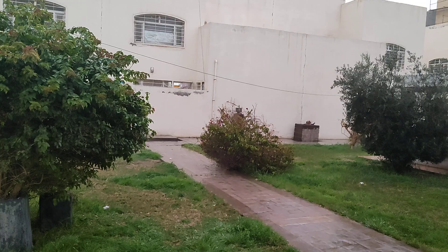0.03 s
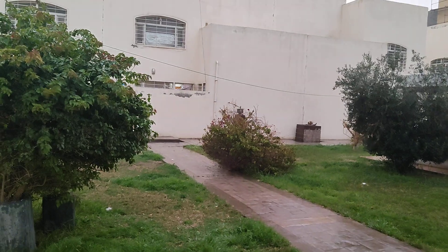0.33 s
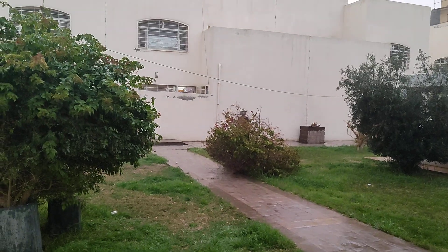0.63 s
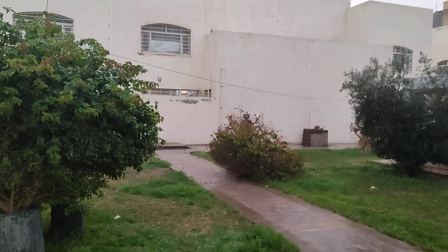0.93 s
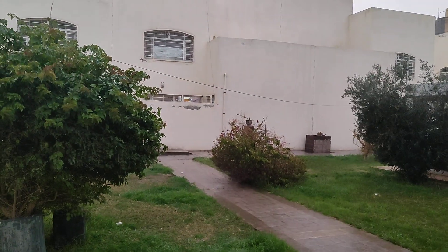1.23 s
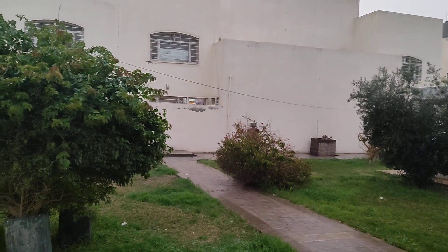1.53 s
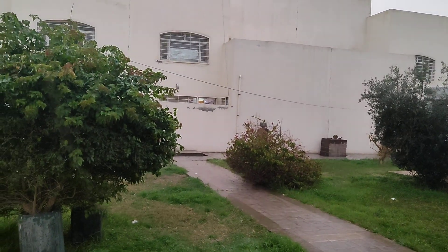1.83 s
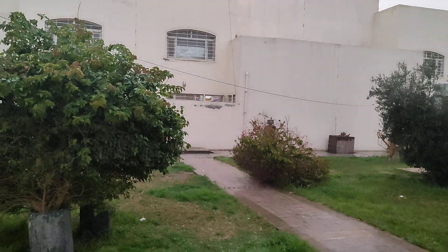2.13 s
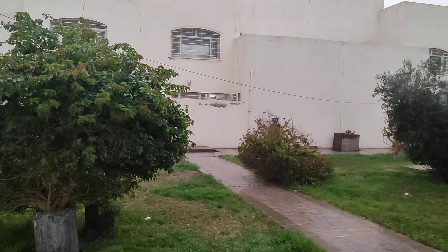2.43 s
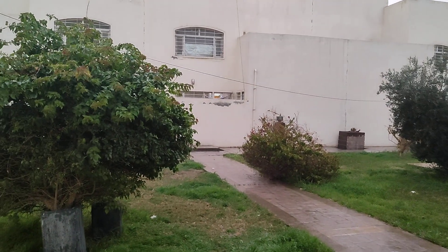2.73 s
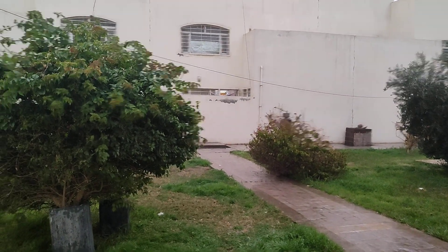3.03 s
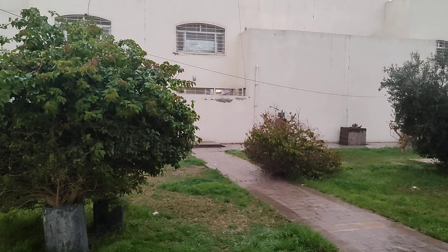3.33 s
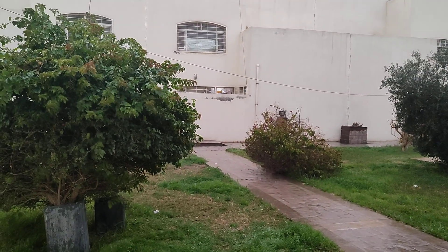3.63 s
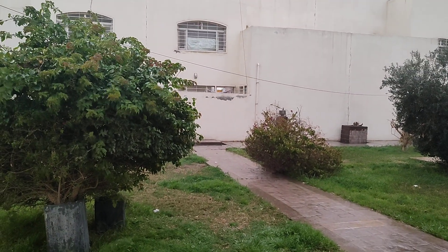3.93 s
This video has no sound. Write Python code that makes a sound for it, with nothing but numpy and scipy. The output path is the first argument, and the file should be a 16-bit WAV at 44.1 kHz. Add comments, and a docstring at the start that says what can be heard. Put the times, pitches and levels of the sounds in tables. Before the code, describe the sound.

Steady light rain outdoors, with low wind rumble and a few taps on the microphone.

```python
"""Light rain on a garden and a paved path: far drops merge into a hiss, a few tick close by.
Gusts buffet the two ports of the hand-held microphone, mostly the left, in rumbles and low thuds.
Right at the microphone, a finger taps and brushes the case a few times.
Far off, a small bird chirps and two thin tones sound."""
import sys
import numpy as np
from scipy import signal
from scipy.fft import rfft, irfft, next_fast_len
from scipy.io import wavfile
from scipy.ndimage import map_coordinates

SR = 44100
rng = np.random.default_rng(int(sys.argv[2]) if len(sys.argv) > 2 else 0)


def generate_wav(signal):
    """Clip the signal to [-1, 1] and save it as 16-bit WAV at the path in sys.argv[1]."""
    frames = np.transpose(np.atleast_2d(signal))
    scaled = np.clip(frames, -1, 1) * 32767
    pcm = np.round(scaled).astype(np.int16)
    wavfile.write(sys.argv[1], SR, pcm)


N = 176400

# spectrum of big slow eddies, also of the input's noise floor (frequency [Hz], level [dB])
RUMBLE_SPECTRUM = [(8, -27.5), (22, -7), (36, 1.5), (70, -2), (150, -7), (240, -17), (350, -30), (520, -42),
                   (1000, -96.5)]
# spectrum of a knock on the microphone case (frequency [Hz], level [dB])
CASE_SPECTRUM = [(40, -2.5), (200, 16), (450, 6.5), (800, -2.5), (1500, -2.5), (3200, 0.5), (5000, -11.5),
                 (8000, -44), (11000, -22.5), (13000, -37.5), (16000, -32)]


def amp(db):
    """Decibels to gain."""
    return 10 ** (np.asarray(db) / 20)


def unit(x):
    """Scale to rms 1."""
    return x / np.sqrt(np.mean(x ** 2) + 1e-20)


def clock():
    """Time of each sample in seconds."""
    return np.arange(N) / SR


def curve(rows):
    """(time [s], value) points joined by lines."""
    return np.interp(clock(), *np.transpose(rows))


def wobble(rate):
    """A smooth random curve, rate knots a second."""
    return map_coordinates(rng.standard_normal(N // 8), [np.arange(N) * rate / SR + 2], mode="wrap")


def filtered(x, response):
    """x through a filter whose gain is a function of frequency."""
    size = next_fast_len(N + SR // 2)
    return irfft(rfft(x, size) * response(np.fft.rfftfreq(size, 1 / SR)), size)[..., :N]


def coloured(x, points):
    """x shaped by (frequency [Hz], level [dB]) points, at rms 1."""
    f, db = np.transpose(points)
    return unit(filtered(x, lambda hz: amp(np.interp(np.log(hz + 1), np.log(f + 1), db))))


def noise(points):
    """Coloured noise of rms 1."""
    return coloured(rng.standard_normal(N), points)


def strike(start, t60, attack=0.00027):
    """A quick attack and an exponential decay."""
    t = np.maximum(clock() - start, 0)
    return (1 - np.exp(-t / attack)) * amp(-60 * t / t60)


def arch(start, length):
    """A rounded swell and fall."""
    return np.sqrt(np.abs(np.sin(np.pi * np.clip((clock() - start) / length, 0, 1))))


def rain(patter_per_s=1500, patter_db=-7.5, spread_db=2.5):
    """Countless drops across the garden merge into a hiss; nearer ones patter on top."""
    # rain spectrum at the microphone (frequency [Hz], left level [dB], right level [dB])
    spectrum = [(60,2.5,3.5), (200,5,5), (311,6,4.5), (443,-9.5,-2), (553,-6,-4), (760,1,0),
                (1140,-12.5,-5), (1420,-5.5,-5), (2050,-5.5,-4), (2700,-7.5,-8), (2977,-9,-1.5),
                (4270,-16.5,-1), (4920,-25,-12), (6130,-31,-14.5), (7000,-35.5,-31), (8000,-32,-42.5),
                (9300,-46,-52.5), (11100,-61,-37), (12800,-64,-54), (15500,-51.5,-57.5)]
    # strength of the rain (time [s], level [dB])
    strength = [(.2, -45.5), (.45, -43.5), (1.0, -44.5), (1.7, -44), (2.1, -41.5), (2.4, -42.5),
                (2.75, -42.5), (3.0, -45.5), (3.5, -47.5), (4.0, -45)]
    # balance of the rain (left gain [dB], right gain [dB])
    balance = [-3.5, -0.5]
    ports = []
    for port, port_db in enumerate(balance):
        sizes = amp(spread_db * np.minimum(rng.exponential(size=N), 4)) * rng.standard_normal(N)
        patter = unit(sizes * (rng.random(N) < patter_per_s / SR))
        drops = rng.standard_normal(N) + amp(patter_db) * patter
        gain = amp(curve(strength) + port_db + 0.31 * wobble(9.3))
        ports.append(gain * coloured(drops, np.array(spectrum)[:, [0, port + 1]]))
    return np.array(ports)


def hiss_bands():
    """Early on, the hiss rings a little in two narrow bands, mostly on the right."""
    # ringing bands of the hiss (centre [Hz], width [Hz], level [dB])
    bands = [(2085, 95, -58.5), (4340, 260, -55)]
    ringing = np.zeros((2, N))
    for hz, width_hz, db in bands:
        band = filtered(rng.standard_normal((2, N)), lambda f: np.exp(-((f - hz) / width_hz) ** 2))
        ringing += amp(db) * unit(band)
    return ringing * arch(start=0.091, length=0.65) * amp([[-6], [2]])


def close_drops(drops_per_s=20, spread_db=3, t60=0.014):
    """Drops tick on leaves and paving near the microphone, each at its own place left to right."""
    # splash spectrum (frequency [Hz], left level [dB], right level [dB])
    spectrum = [(800, -21.5, -25), (2470, 7, 6.5), (4500, -2.5, 10), (6300, -3, -3.5), (8100, -1.5, -15.5),
                (9500, -12.5, -25), (11000, -27, -6), (12200, -29, -25), (15500, -19, -25.5)]
    chance = rng.random(N)
    sizes = amp(spread_db * np.clip(rng.standard_normal(N), -2, 2))
    hits = sizes * (chance < drops_per_s / SR)
    splashes = signal.lfilter([1], [1, -amp(-60 / (t60 * SR))], hits) * rng.standard_normal(N)
    pan = np.arccos(np.tanh(wobble(20))) / 2
    ports = [coloured(splashes * share, np.array(spectrum)[:, [0, port + 1]])
             for port, share in enumerate([np.cos(pan), np.sin(pan)])]
    return amp(-76) * np.array(ports)


def wind(reference_db=-12, flutter_growth=1.29):
    """Turbulence on each port: flutter grows faster than rumble, so harder gusts are brighter."""
    # wind pressure on the left port (time [s], level [dB])
    left_pressure = [(.33,-72), (.42,-32.5), (.46,-23), (.6,-23.5), (.68,-21.5), (.71,-31), (.78,-24),
                     (.83,-32), (.92,-30), (.97,-21.5), (1.1,-36), (1.2,-38.5), (1.5,-42.5), (1.56,-18.5),
                     (1.66,-45.5), (1.78,-38), (1.85,-44.5), (2.21,-68), (2.27,-35), (2.3,-19),
                     (2.38,-31.5), (2.49,-33), (2.56,-21.5), (2.69,-17), (2.74,-30), (2.78,-15.5),
                     (2.815,-30), (2.86,-17), (2.99,-13), (3.06,-18), (3.32,-20), (3.36,-33), (3.42,-23),
                     (3.45,-13), (3.55,-25), (3.61,-18.5), (3.71,-33), (3.81,-18), (3.89,-31), (3.96,-50.5)]
    # wind pressure on the right port (time [s], level [dB])
    right_pressure = [(.3,-75), (.48,-31), (.56,-36), (.9,-39.5), (1.05,-30.5), (1.14,-42), (1.6,-50),
                      (2.38,-61), (2.54,-30), (2.62,-43), (2.72,-28), (2.82,-48), (2.93,-17), (3.03,-37.5),
                      (3.1,-27), (3.33,-18), (3.38,-36), (3.52,-37.5), (3.59,-28), (3.76,-51), (4.0,-56)]
    # balance of the wind (left gain [dB], right gain [dB])
    balance = [0, 0.5]
    # spectrum of small quick eddies (frequency [Hz], level [dB])
    flutter_spectrum = [(60, -29), (170, 1.5), (280, -6), (420, -12.5), (650, -26.5), (1000, -27),
                        (2000, -89.5)]
    ports = []
    for pressure, port_db in zip([left_pressure, right_pressure], balance):
        gust_db = curve(pressure) + port_db
        flutter_db = reference_db - 15 + flutter_growth * (gust_db - reference_db)
        rumble = unit(amp(2 * wobble(35)) * noise(RUMBLE_SPECTRUM))
        flutter = unit(amp(3 * wobble(60)) * noise(flutter_spectrum))
        ports.append(amp(gust_db) * rumble + amp(flutter_db) * flutter)
    return np.array(ports)


def buffets(puff_half_width_s=0.0039):
    """Single eddies hit the left port: a push of pressure between two shallow dips, and a rough puff."""
    # eddy strikes (time [s], peak level [dB], centre [Hz], puff level [dB])
    eddies = [(.454,-7.5,170,-30.5), (0.485,-14.5,130,-49.5), (.585,-14,210,-30), (.662,-7,69,-45),
              (.674,-10.5,143,-31.5), (0.981,-9.5,165,-43), (1.061,-14.5,170,-38), (1.19,-22.5,118,-55),
              (1.434,-24,127,-54.5), (1.561,-8.5,141,-40.5), (1.577,-8.5,158,-37), (1.625,-20.5,139,-48.5),
              (1.764,-16,218,-37), (1.777,-14,228,-34.5), (1.784,-16,180,-40), (1.8,-21,170,-47),
              (2.242,-21.5,68,-52.5), (2.288,-10,161,-33), (2.304,-13.5,122,-43), (2.835,-7,89.5,-41),
              (2.88,-5,180,-24.5), (2.961,-5.5,110,-26), (3.02,-13.5,310,-24.5), (3.186,-13.5,159,-39.5),
              (3.445,-4,139,-29), (3.508,-15.5,210,-30.5), (3.593,-14,140,-36), (3.64,-14,140,-40),
              (3.68,-16.5,113,-47.5), (3.813,-16.5,201,-31.5)]
    # spectrum of the puff inside an eddy (frequency [Hz], level [dB])
    puff_spectrum = [(150, -15.5), (300, 9.5), (450, 2), (700, -4), (1000, -21.5), (2200, -31), (4000, -61)]
    pushes, puffs = np.zeros((2, N))
    for peak_s, db, hz, puff_db in eddies:
        t = clock() - peak_s
        phase_squared = np.minimum((np.pi * hz * t) ** 2, 50)
        pushes += amp(db) * (1 - 2 * phase_squared) * np.exp(-phase_squared)
        puffs += amp(puff_db) / (1 + (t / puff_half_width_s) ** 2)
    return (pushes + puffs * noise(puff_spectrum)) * amp([[0], [-28]])


def case_taps():
    """Dead knocks on the microphone: a crack, duller for soft contacts, and a low thump of the case."""
    # taps (time [s], left level [dB], right level [dB], t60 [s], dull above [Hz], thump level [dB])
    knocks = [(.182, -30, -24, 0.023, 1490, -23), (2.483, -54, -44, 0.022, 2500, -27.5),
              (2.536, -57, -32, .008, 900, -25), (2.5354, -38, -12, .008, 2640, -21),
              (3.2256, -36, -3, 0.01, 2600, -22.5), (3.238, -12, -34.5, 0.012, 7000, -48),
              (3.2505, -27, -16, 0.0093, 1600, -18), (3.963, -41, -31.5, 0.025, 2500, -46)]
    # modes of the case (frequency [Hz], level [dB], t60 [s])
    modes = [(197.7, 0.5, 0.043), (308, -1, 0.029), (397, -2.5, 0.037), (670, -3.5, 0.025)]
    # balance of the thump (left gain [dB], right gain [dB])
    thump_balance = [-15, -0.5]
    out = np.zeros((2, N))
    crack = np.array([noise(CASE_SPECTRUM), noise(CASE_SPECTRUM)])
    for start, left_db, right_db, t60, dull_hz, thump_db in knocks:
        dulled = unit(filtered(crack, lambda hz: 1 / np.sqrt(1 + (hz / dull_hz) ** 2)))
        thump = sum(amp(db) * strike(start, ring_s) * np.sin(2 * np.pi * hz * (clock() - start))
                    for hz, db, ring_s in modes)
        out += amp([[left_db], [right_db]]) * strike(start, t60) * dulled
        out += amp(thump_db) * np.outer(amp(thump_balance), thump)
    return out


def handling(scuff_s=3.236, scuff_half_width_s=0.0016):
    """A finger ticks and brushes on the case beside the left port; the last brush catches in a scuff."""
    # sharp ticks (time [s], level [dB])
    ticks = [(2.455, -41), (3.1506, -26), (3.502, -55.5)]
    # swelling brushes (start [s], length [s], end level [dB], swell [dB])
    brushes = [(2.476, 0.062, -56.5, 12.5), (3.164, .073, -37, 31)]
    # spectrum of finger friction (frequency [Hz], level [dB])
    friction_spectrum = [(300, -22.5), (1500, -1), (4000, -3.5), (6000, -3.5), (8200, -3.5), (9600, -15.5),
                         (11000, -26.5), (13500, -36), (15300, -13), (16500, -12.5)]
    t = clock()
    force = sum(amp(db) * strike(start, t60=0.012) for start, db in ticks)
    for start, length, end_db, swell_db in brushes:
        progress = (t - start) / length
        touching = (progress > 0) & (progress < 1)
        force += touching * amp(end_db + swell_db * (np.clip(progress, 0, 1) - 1))
    scuff = amp(-22.5) * np.exp(-((t - scuff_s) / scuff_half_width_s) ** 2) * noise(CASE_SPECTRUM)
    return (force * noise(friction_spectrum) + scuff) * amp([[0], [-18]])


def far_bird(blur_hz=380):
    """A small bird far to the right: raspy sliding chirps, noise-blurred as by echoes between walls."""
    # chirps (start [s], length [s], start pitch [Hz], end pitch [Hz], level [dB])
    chirps = [(2.607, .035, 4850, 4580, -55), (2.676, 0.033, 5000, 5200, -48),
              (2.768, .04, 5070, 4710, -54.5), (3.329, 0.039, 5320, 5150, -57),
              (3.412, 0.063, 5130, 4640, -57)]
    out, t = np.zeros(N), clock()
    rasp = unit(filtered(rng.standard_normal((2, N)), lambda hz: 1 / (1 + (hz / blur_hz) ** 4)))
    for start, length, start_hz, end_hz, db in chirps:
        pitch = np.interp(t, [start, start + length], [start_hz, end_hz])
        phase = 2 * np.pi * np.cumsum(pitch) / SR
        out += amp(db) * arch(start, length) * (rasp[0] * np.sin(phase) + rasp[1] * np.cos(phase))
    return out * amp([[-9], [2]])


def far_tones(glide_s=0.04, waver_hz=22):
    """Two thin tones in the distance; each slides up and holds, wavering."""
    # tones (start [s], length [s], start pitch [Hz], held pitch [Hz], level [dB])
    tones = [(3.242, 0.47, 1510, 1521, -61), (3.63, .45, 1040, 1154, -57)]
    out, t = np.zeros(N), clock()
    for start, length, start_hz, held_hz, db in tones:
        glide = (start_hz - held_hz) * np.exp(-np.maximum(t - start, 0) / glide_s)
        pitch = held_hz + glide + waver_hz * wobble(60)
        envelope = amp(db + 2 * wobble(30.34)) * arch(start, length)
        out += envelope * np.sin(2 * np.pi * np.cumsum(pitch) / SR)
    return out * amp([[-1], [1]])


def scene():
    """Rain in the garden, wind and touch on the microphone, a bird and tones in the distance."""
    rainfall = rain() + hiss_bands() + close_drops()
    on_microphone = wind() + buffets() + case_taps() + handling()
    return rainfall + on_microphone + far_bird() + far_tones()


def record(dry, open_s=0.15, fade_s=0.2, top_hz=15900):
    """The microphone input opens after a moment and fades in, band-limited, over a faint low floor."""
    gain = np.interp(clock(), [open_s, open_s + 0.0097, open_s + fade_s], [0, 0.31, 1])
    floor = amp(-89) * noise(RUMBLE_SPECTRUM) * amp([[3], [-9]])
    return filtered(dry * gain + floor, lambda hz: hz < top_hz)


dry = scene()
out = record(dry)
generate_wav(out)
```